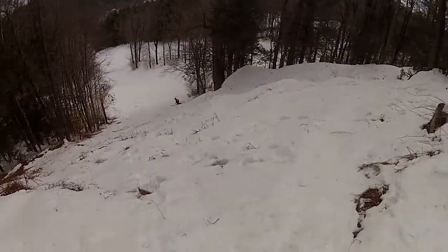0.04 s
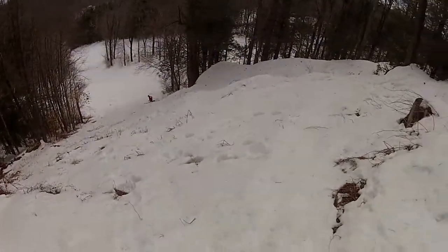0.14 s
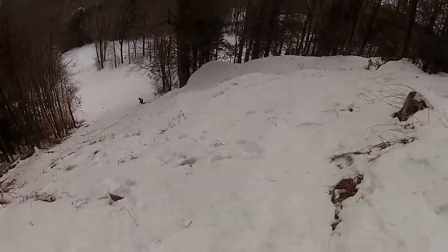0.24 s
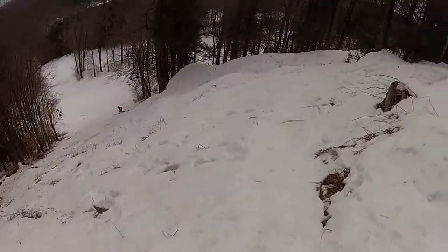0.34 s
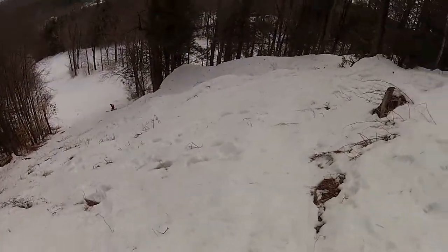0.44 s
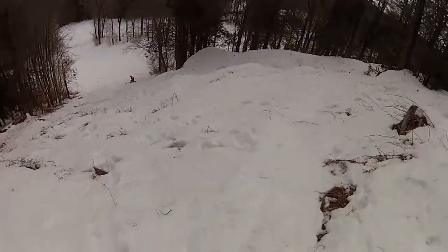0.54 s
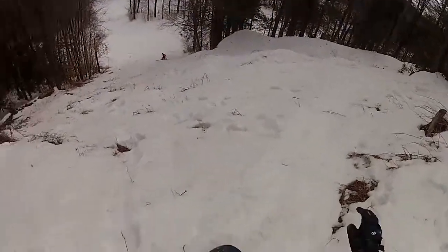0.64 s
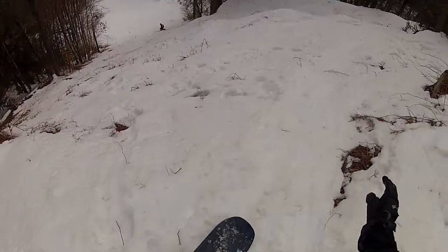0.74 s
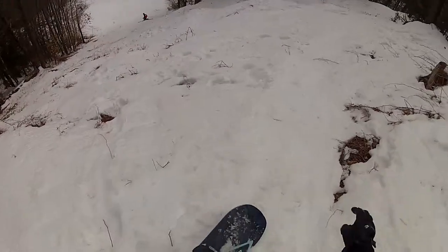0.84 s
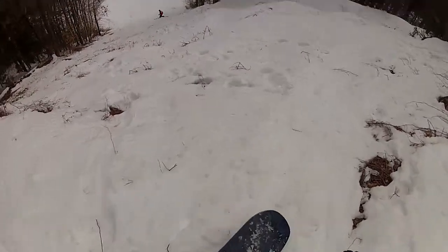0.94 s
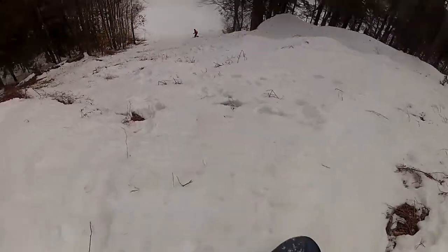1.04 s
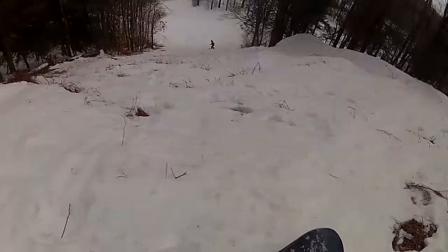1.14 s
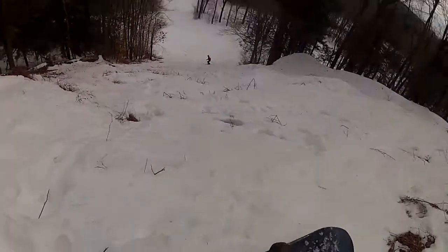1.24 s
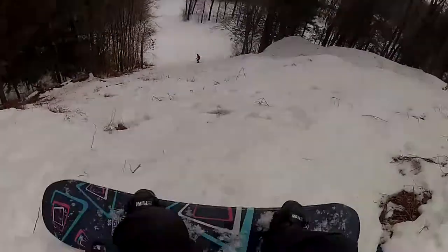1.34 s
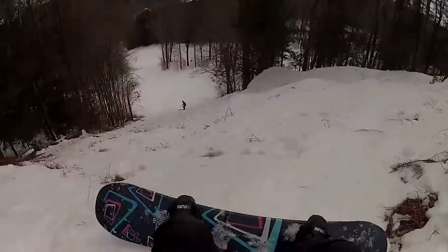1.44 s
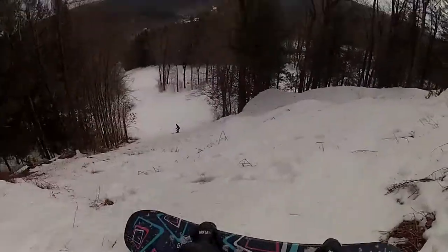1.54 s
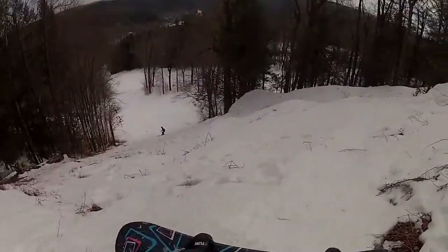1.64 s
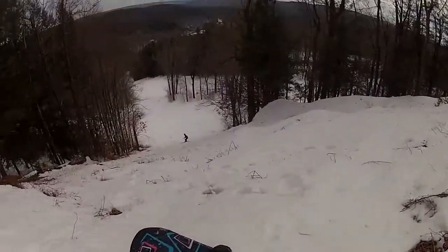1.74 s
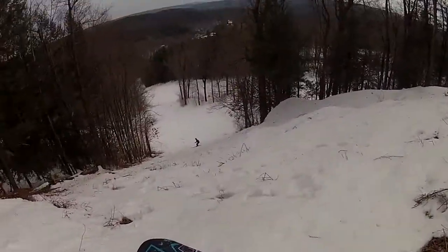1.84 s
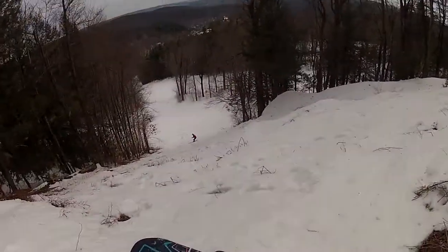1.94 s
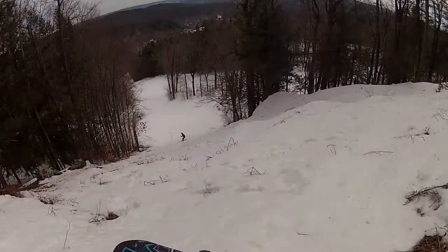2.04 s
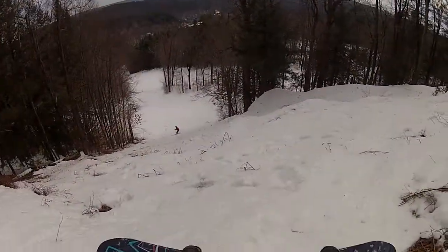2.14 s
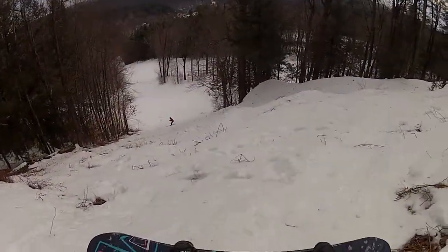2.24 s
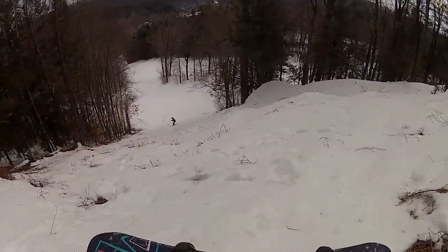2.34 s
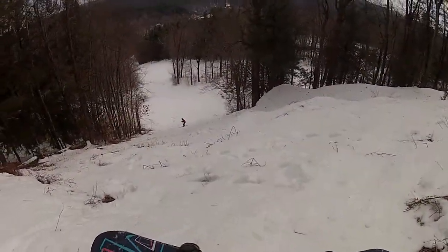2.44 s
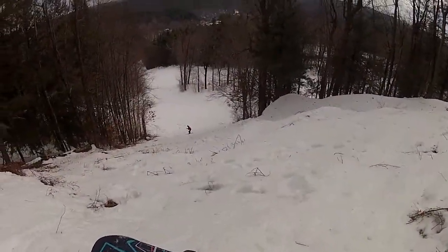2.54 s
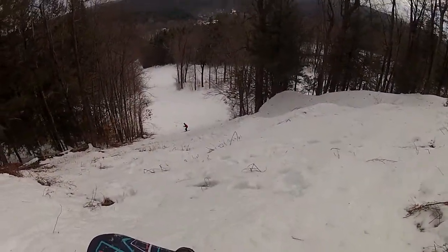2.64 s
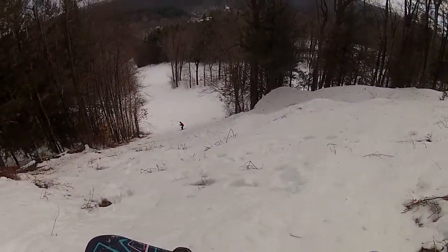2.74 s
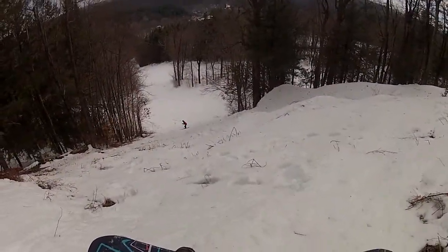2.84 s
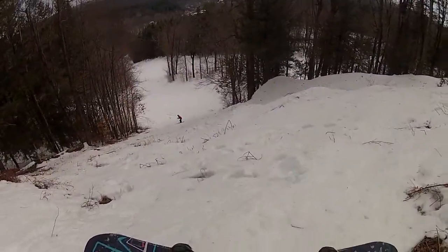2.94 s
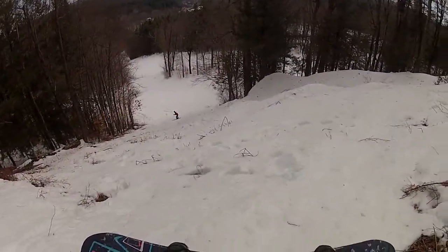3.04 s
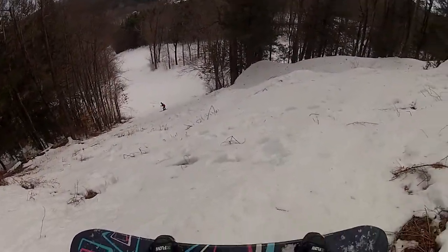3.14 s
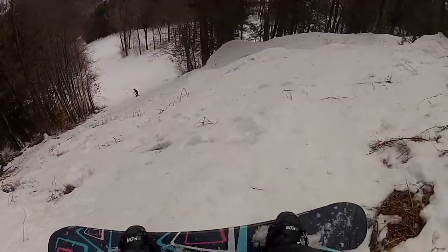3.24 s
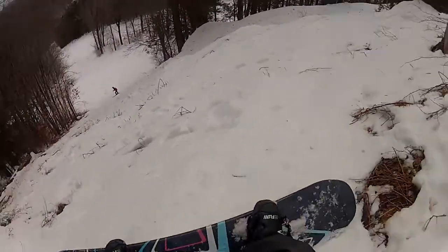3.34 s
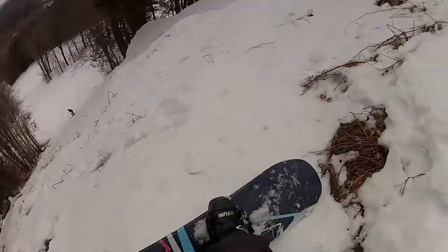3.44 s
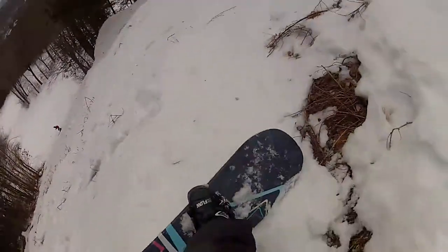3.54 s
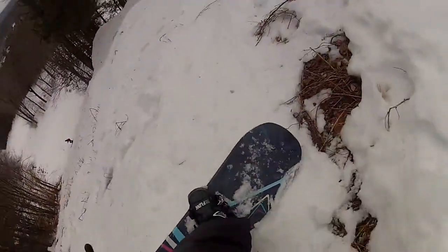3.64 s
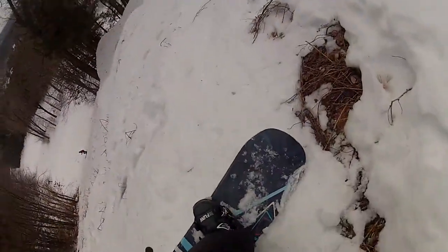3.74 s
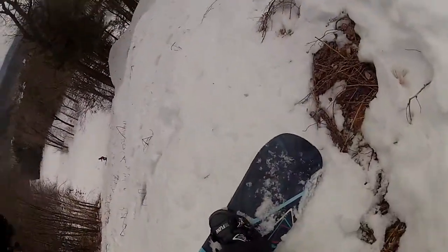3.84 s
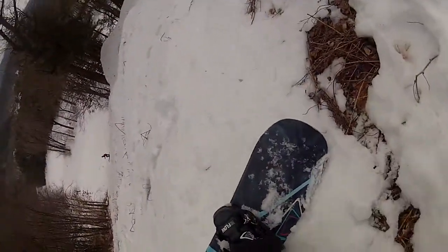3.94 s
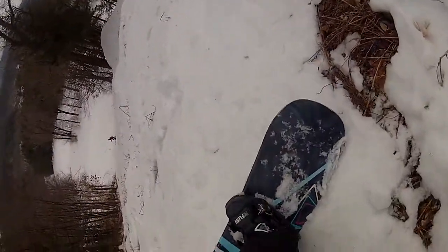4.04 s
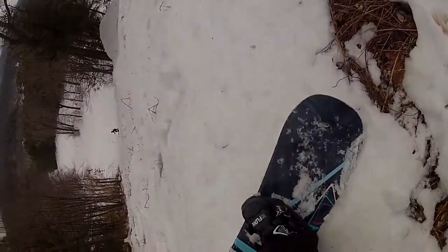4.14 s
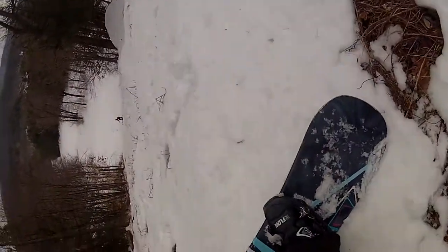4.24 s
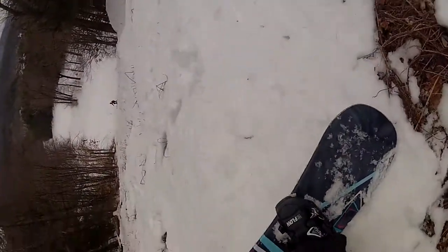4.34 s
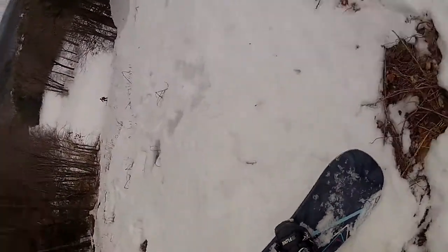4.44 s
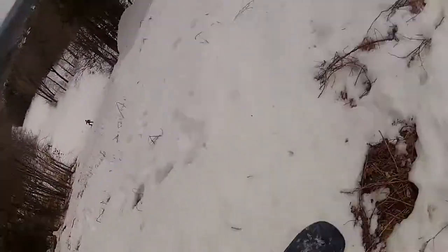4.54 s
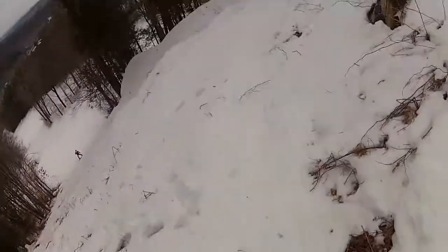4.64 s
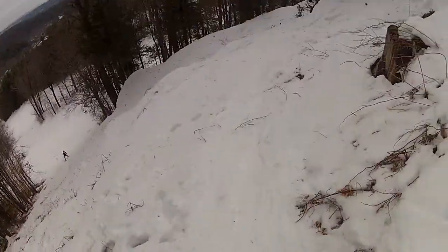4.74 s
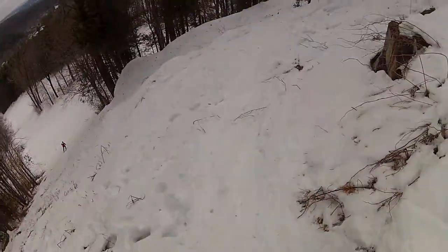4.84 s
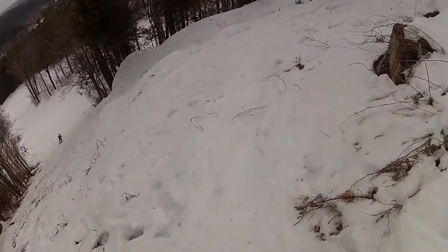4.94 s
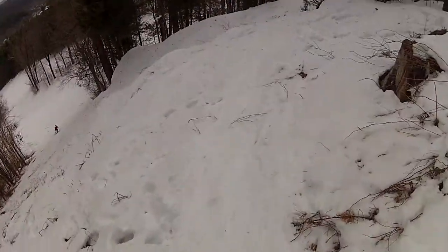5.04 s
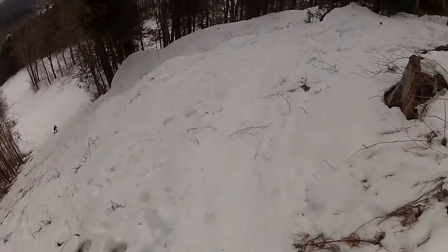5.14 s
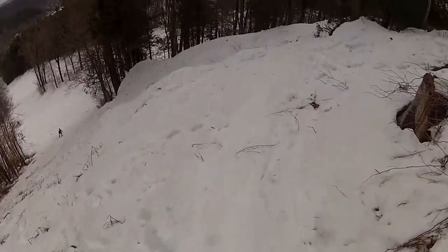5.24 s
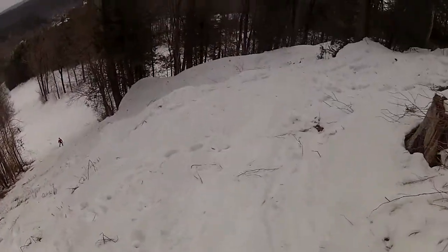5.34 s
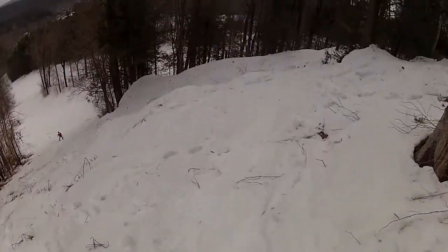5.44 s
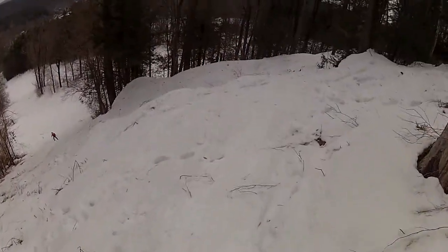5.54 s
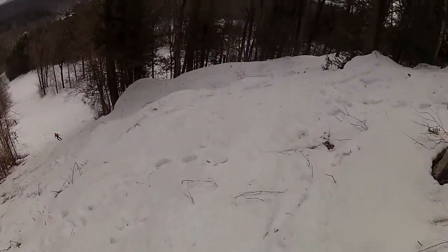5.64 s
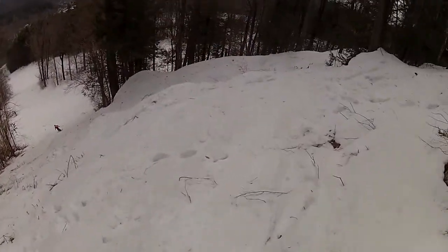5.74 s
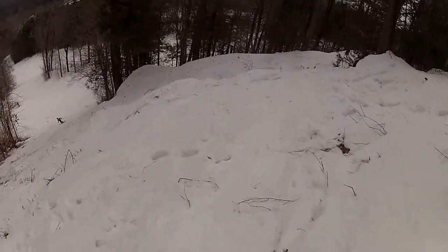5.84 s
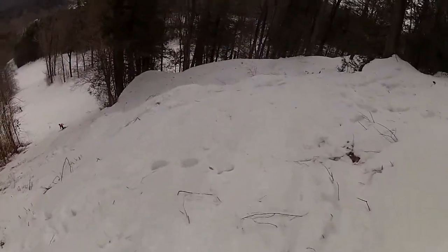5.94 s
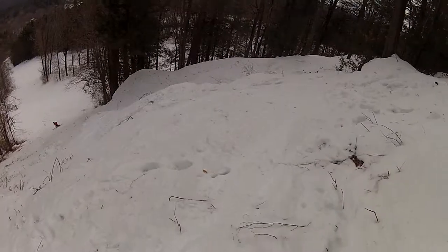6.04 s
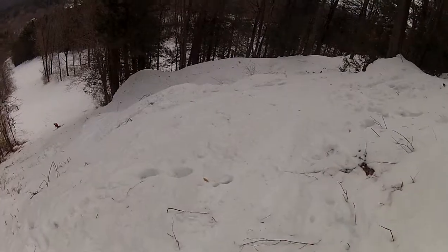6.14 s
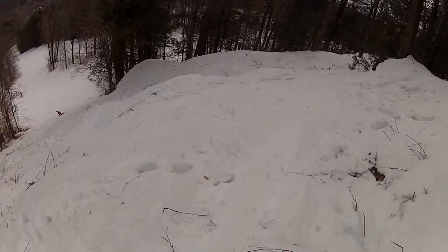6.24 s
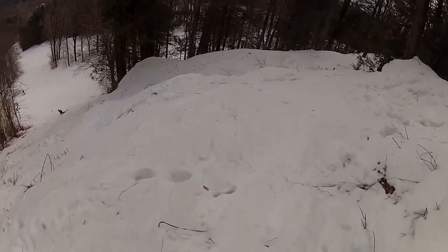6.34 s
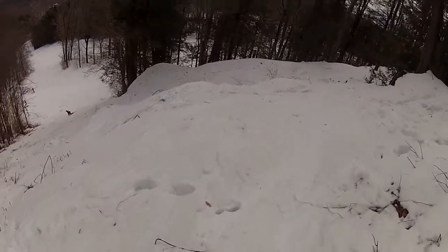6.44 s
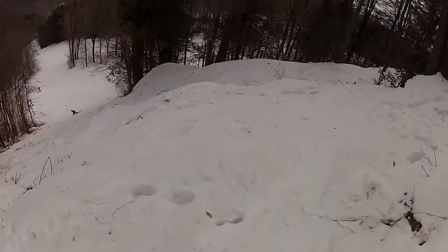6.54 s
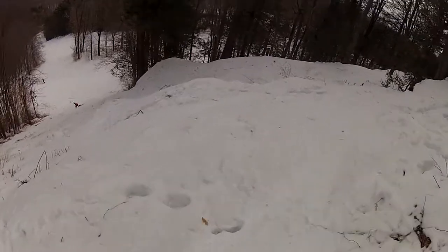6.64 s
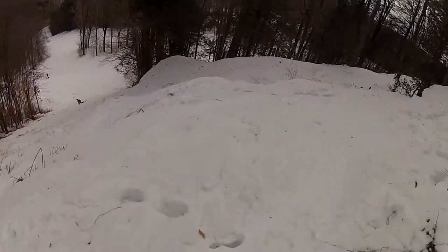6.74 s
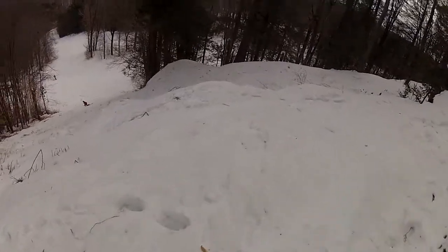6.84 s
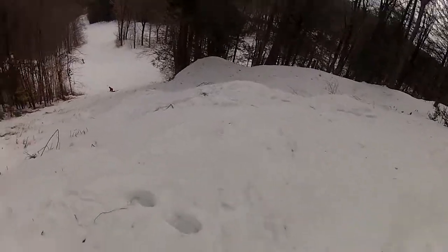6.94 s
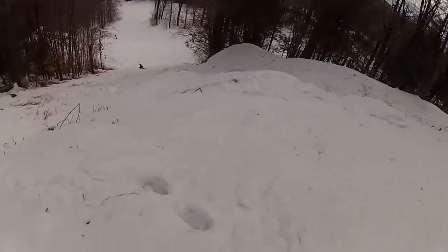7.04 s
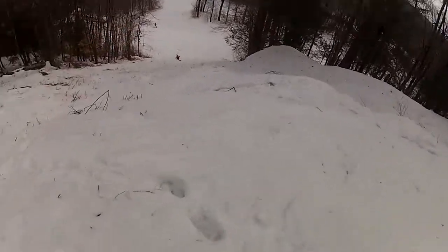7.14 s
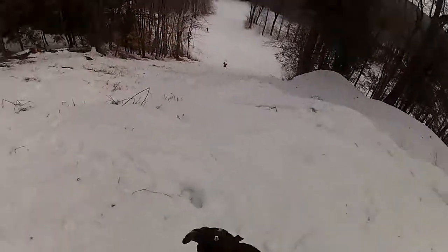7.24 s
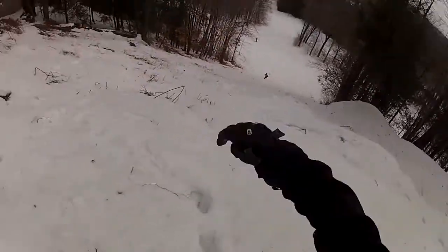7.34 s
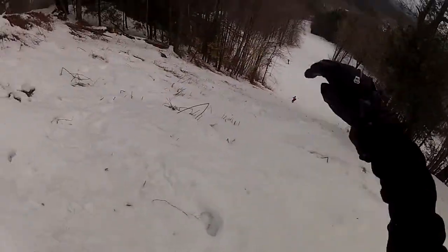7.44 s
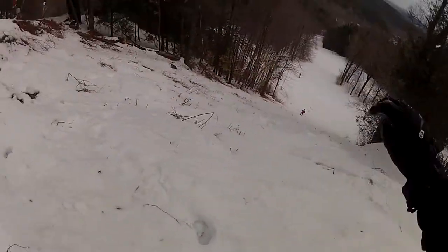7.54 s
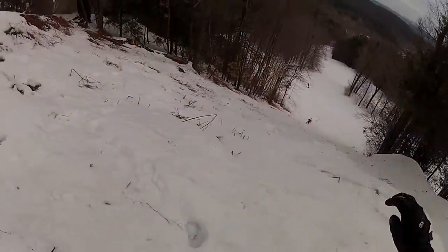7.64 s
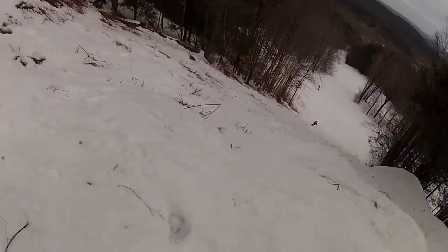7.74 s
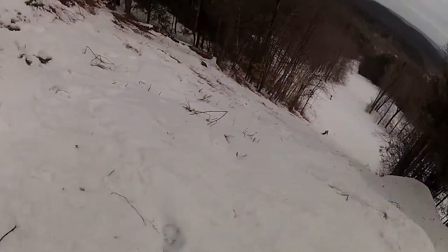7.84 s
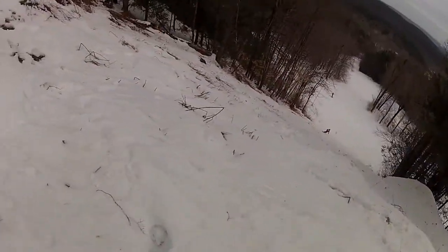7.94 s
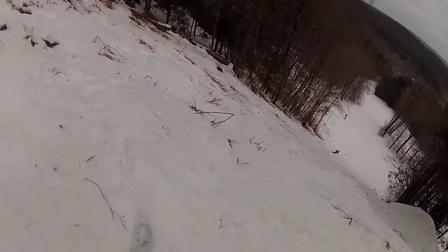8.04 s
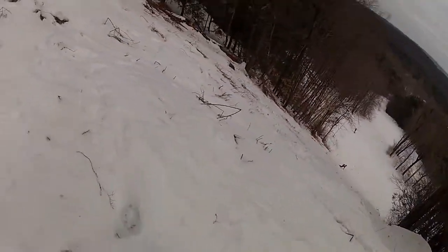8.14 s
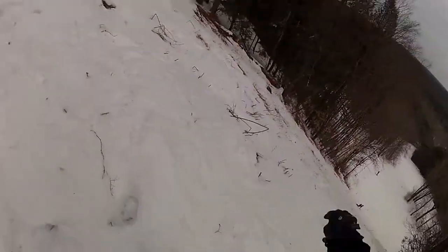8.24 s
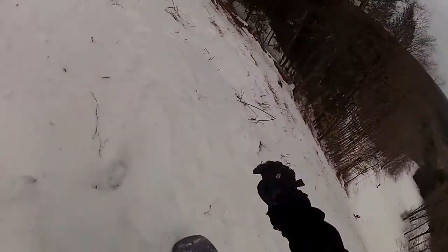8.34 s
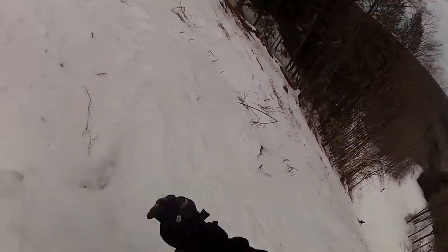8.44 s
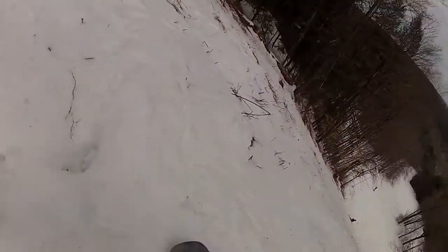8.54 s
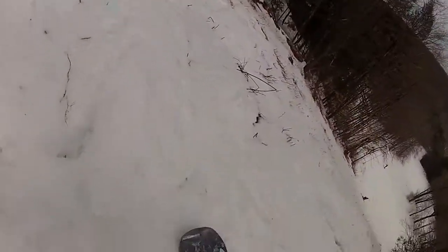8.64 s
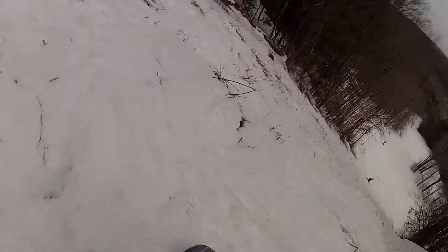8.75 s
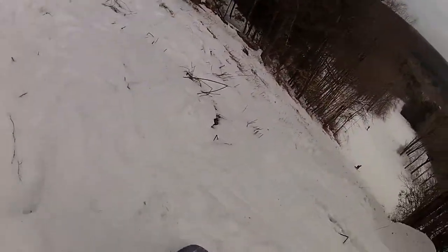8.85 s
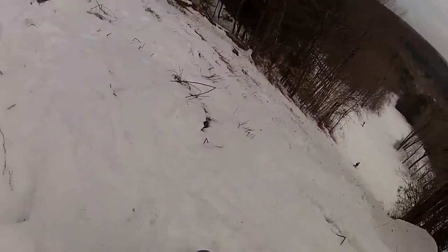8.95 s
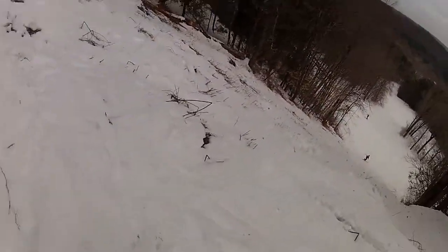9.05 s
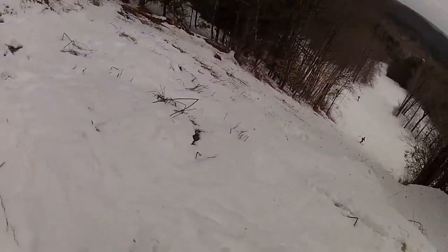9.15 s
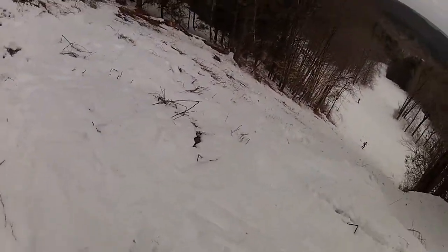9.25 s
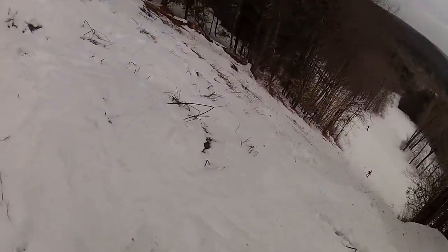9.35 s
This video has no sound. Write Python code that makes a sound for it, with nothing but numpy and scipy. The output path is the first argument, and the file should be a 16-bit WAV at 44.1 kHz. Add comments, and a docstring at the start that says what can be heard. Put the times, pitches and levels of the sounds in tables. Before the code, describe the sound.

Muffled, gritty scrapes of a board on hard snow come and go, broken by soft knocks, crust snaps and brief low rumbles.

```python
"""A crusty snow slope, heard inside the closed housing of a helmet camera as a snowboard sidles and scrapes down.
The edge grinds in bursts: crumbling noise drives the board's body and bending modes and throws hissing spray.
Swelling low noise is the rumble of board and wind; coloured noise and a wavering tone make the far slope and its hum.
Paired sine modes slap, and short noise cracks ring the housing and ping as crust and twigs snap.
The camera holds each sample for a 12 kHz step, which mirrors the sound around that rate."""
import sys
import numpy as np
from scipy import signal
from scipy.fft import rfft, irfft, next_fast_len
from scipy.io import wavfile
from scipy.ndimage import uniform_filter1d, map_coordinates

SR = 44100
rng = np.random.default_rng(int(sys.argv[2]) if len(sys.argv) > 2 else 0)


def materialize(psi):
    """Save the field psi as 16-bit PCM at rate SR to the path in sys.argv[1].

    A 1-D psi becomes a single channel; in a 2-D psi each row is a channel.
    """
    bounded = np.clip(np.atleast_2d(psi).T, -1, 1)
    quanta = np.round(bounded * 32767).astype(np.int16)
    wavfile.write(sys.argv[1], SR, quanta)


N = 414981

# The steady slide: [t/s, grinding level/dB, upper mode level/dB re grinding, spray level/dB re grinding]
STEADY_SLIDE = [(0, -54.5, -4, -8.5), (1, -46.5, 7, -4), (1.9, -49.5, 4.5, -9), (2.6, -51, -4.5, -9.5),
                (2.9, -56.5, -3.5, -10.5), (3.6, -52, 4, -8), (4.15, -58, 1, -8), (4.55, -50.5, 4.5, -6.5),
                (4.8, -38.5, -2.5, -13), (5.1, -33, -0.5, -20), (5.6, -31, -5, -17.5), (5.95, -34, 3, -12),
                (6.18, -44.5, 6, -8), (6.45, -40, 7.5, -6.5), (6.7, -28, -6.5, -19), (7, -40, 3.5, -7.5),
                (7.1, -39, 4, -12), (7.31, -53, 5, -3.5), (8.5, -42.5, -3.5, -12.5),
                (9.13, -47.5, 0, -12.5), (9.23, -57, -2, -9), (9.41, -50, 4, -11)]
# Edge bites: [start t/s, length t/s, grinding level/dB at release, climb during the bite level/dB,
#              upper mode level/dB re grinding, spray level/dB re grinding]
EDGE_BITES = [(.125, 0.16, -35.5, 5, -3.5, -18.5), (.29, 0.084, -25, 18.5, -0.5, -17),
              (.39, 0.096, -34, -1, -0.5, -16.5), (.595, 0.026, -44, -1.5, 5, -5.5),
              (.65, 0.04, -37.5, 7, 11.5, -2), (.822, 0.016, -49, 2, -4, 5),
              (.87, 0.032, -42.5, -2.5, 7.5, -14), (.97, 0.045, -29, 10.5, -0.5, -12.5),
              (1.05, 0.057, -35.5, 14, 5, -4), (1.15, 0.069, -35, 17, 5, -7.5),
              (1.28, 0.077, -22.5, 10, -2.5, -8.5), (1.385, .03, -37, -4.5, 3, -2.5),
              (1.43, 0.073, -29, 2.5, 6, -4), (1.521, 0.083, -19, 2, -4.5, -13.5),
              (1.614, 0.039, -28, -7.5, -7, -16), (1.733, 0.06, -30.5, -1.5, -4, -17),
              (1.8, 0.045, -44.5, -9, 4, -14), (2.02, 0.075, -28, 5.5, -5, -16.5),
              (2.119, 0.12, -33, -3, -2.5, -11), (2.45, 0.086, -42, 6.5, 1, -15.5),
              (3.15, 0.054, -36, 17, -1, -12), (3.27, 0.046, -38.5, 19, 0, -6),
              (3.57, 0.017, -52.5, -11, 5, -11.5), (3.72, 0.075, -44, 6, 1, -13),
              (4.201, 0.034, -39, -2.5, -5, -10.5), (4.63, 0.062, -37, 6, -3, -29),
              (4.87, 0.015, -36, 4, -26, -25), (5.03, 0.11, -29, 11, -23, -18.5),
              (5.4, 0.097, -32.5, 0, -5, -14), (5.72, 0.018, -38, 0, 4, -16),
              (5.88, 0.094, -29.5, 10, 3.5, -16), (6.275, 0.017, -47, 3, 17.5, -17),
              (6.53, 0.075, -36, 1, 4.5, -20), (6.759, 0.085, -23.5, 3.5, -6.5, -20.5),
              (6.86, 0.092, -29, -2.5, 2.5, -18), (7.39, 0.097, -46.5, -5.5, -4, -9.5),
              (7.568, 0.546, -30.5, 1.5, -2.5, -20.5), (7.89, 0.068, -31, 14, -9, -18),
              (7.999, 0.11, -38.5, 1, -10, -10), (8.13, 0.082, -26.5, 8, -3.5, -14.5),
              (8.241, 0.072, -24, 1.5, -8.5, -19), (8.34, 0.092, -31, -2.5, -2.5, -13.5),
              (8.429, 0.051, -22.5, 5, -6, -21), (8.565, 0.018, -42, 4, -5, -25),
              (8.63, 0.063, -28, -2, -4.5, -24), (8.695, 0.029, -28.5, 0, 1.5, -23),
              (8.73, .11, -37, -11, -4.5, -20), (8.899, 0.099, -28.5, 7, -2.5, -14.5),
              (9.011, 0.13, -37.5, -7, 2, -17.5), (9.3, 0.023, -44, 9.5, 10.5, -3)]
# How fast a bite dies when it lets go, one row each for grinding, upper mode, spray: [fall/(dB/s)]
BITE_RELEASE = [
    [400],
    [450],
    [560],
]
GRIP_DB_PER_S = 698  # how fast a bite sets in

# Colour of the board's low body: [f/Hz, level/dB]
LOW_BODY_COLOUR = [(60, -41.5), (110, -9.5), (160, -6), (230, -3), (310, 3), (400, -4), (520, -10.5),
                   (900, -60)]
# Colour of the board's upper body mode: [f/Hz, level/dB]
UPPER_BODY_COLOUR = [(250, -43.5), (400, -3), (500, -1), (620, 2), (720, 1), (820, -9.5), (950, -19),
                     (1150, -35.5), (1500, -47.5)]
# The board's bending mode: [f/Hz, width f/Hz, level/dB]
BENDING_MODE = [(138.4, 52, 0)]
# How strongly the board bends: [t/s, bending level/dB re grinding]
BENDING_LEVEL = [(0, -10), (1.7, -9), (3, -16.5), (4, -4), (4.8, -20), (5.8, -9.5), (7.5, -11.5),
                 (9.41, -22)]
# Colour of the thrown snow: [f/Hz, level/dB per Hz]
SPRAY_COLOUR = [(600, -22.5), (1000, 1.5), (1400, -2), (1750, -1), (2050, 1.5), (2300, -1.5), (2650, -1),
                (3050, 0.5), (3400, -9), (3870, -3), (4250, -13.5), (5050, -10.5), (5900, -29.5)]
# Fine spray gains this many dB for each dB of spray above the even level
FINE_ABOVE_HZ, FINE_GROWTH, FINE_EVEN_DB = 3700, 0.092, -41.5

# Swells of the low rumble: [peak t/s, level/dB]
RUMBLE_SWELLS = [(.15, -51), (.47, -54), (.73, -42), (.92, -47), (1.2, -35), (1.28, -27), (1.5, -48),
                 (2.04, -52), (3.72, -49), (4.56, -61), (5.87, -44), (6.8, -49), (7.58, -41.5), (8.25, -41),
                 (8.65, -57)]
FLOOR_DB, SWELL_RISE_DB_PER_S, SWELL_FALL_DB_PER_S = -60, 113, 70
# Colour of the low rumble: [f/Hz, level/dB]
RUMBLE_COLOUR = [(12, -50), (25, -5.5), (40, -3), (65, 0.5), (100, 2), (160, -43.5)]

# Colour of the distant slope and woods: [f/Hz, level/dB per Hz]
FAR_COLOUR = [(60, -27), (130, -3), (270, -7.5), (450, -2), (680, -16), (900, -24), (1500, -44),
              (3000, -29.5), (4500, -28), (5900, -32)]
# The far hum: [t/s, level/dB]
HUM_LEVEL = [(1.6, -58), (4.4, -56), (4.8, -58), (9.41, -62)]

# Board slaps and jolts: [t/s, low mode level/dB, upper mode level/dB re low mode, low mode f/Hz]
BOARD_SLAPS = [(0.039, -22.5, -14, 226), (.11, -18, -28, 197), (0.133, -19.5, -27, 305),
               (.377, -16, -12, 357), (.489, -26.5, 8, 338), (0.577, -19, -5, 302), (0.733, -19, -7, 275),
               (0.758, -22, 11.5, 243), (.768, -30, 7, 333), (1.087, -23, 2.5, 350), (1.197, -27, 4, 200),
               (1.268, -9, -10.5, 234), (1.725, -11.5, -15, 217), (1.891, -15.5, 2, 370),
               (1.935, -31.5, 4.5, 358), (2.029, -17.5, -14, 276), (2.795, -42.5, 4.5, 282),
               (2.857, -44.5, 4.5, 283), (3.126, -27.5, -6.5, 274), (3.273, -33.5, 1, 220),
               (3.288, -29.5, -15, 219), (3.304, -22, -18, 286), (3.345, -41, 18, 270),
               (3.437, -14, -14, 312), (3.555, -28, 6, 256), (3.716, -40.5, 10.5, 258),
               (3.896, -38, 6.5, 326), (4.198, -15, -2.5, 303), (4.204, -14, -5, 314), (4.24, -36, 8, 258),
               (4.453, -27, -5.5, 219), (4.638, -25, -4, 342), (4.938, -31.5, 15, 375),
               (4.944, -17.5, 0.5, 360), (5.071, -16.5, -21, 340), (5.624, -14.5, -12, 234),
               (5.673, -15, -9, 302), (5.68, -12, -20, 125), (5.69, -16, -6, 183), (5.849, -14, -20, 126),
               (5.854, -19.5, -1, 268), (5.955, -21, 0, 287), (5.957, -14, -20, 140),
               (6.844, -16, -24, 340), (7.384, -27, -15, 282), (7.426, -27.5, 0, 302),
               (7.565, -19, -20, 270), (7.957, -16, -20, 266), (8.257, -21.5, 1, 228),
               (8.616, -12, -11, 307), (8.637, -8, -30, 292), (9.314, -25.5, -5, 324)]
UPPER_ABOVE_HZ = 284  # the upper mode lies this far above the low one

# Snaps of crust and twigs: [t/s, drive level/dB, bright level/dB re drive, knock level/dB re drive,
#                            burst's 60 dB decay t/s, ping f/Hz, ping level/dB re drive]
CRUST_SNAPS = [(0.1676, -34.5, -9, -17, 0.025, 2970, -12), (0.431, -39, -13, 1, 0.015, 2980, -16),
               (0.7392, -35, -6, -6, 0.017, 2600, -3.5), (0.7563, -29, 0, 9, 0.032, 3200, -4),
               (1.1938, -39, 7.5, -2, 0.025, 3000, -8), (2.792, -50, -11, 1, 0.039, 2930, 5),
               (2.856, -49, -18, -12, 0.02, 2570, -12), (3.3415, -24.5, -8, -8, 0.018, 2800, -10.5),
               (3.5537, -26.5, -19, -10, 0.029, 3150, -14.5), (3.678, -38.5, -14, -11, 0.025, 3010, -10.5),
               (3.783, -48, -15, 3.5, 0.019, 3050, -6), (3.82, -47, -9, -2, 0.02, 3070, -6),
               (3.863, -40, -11, -9, 0.036, 2860, -11), (3.897, -47, -12, -5, 0.033, 2830, -13),
               (4.887, -40, -7, -16, 0.022, 2960, -7), (4.9097, -31, -20, -18, 0.019, 2600, -17),
               (4.938, -18, -10.5, -10, 0.04, 3070, -17), (4.9439, -15.5, -21, -15, 0.024, 2530, -11.5),
               (5.3961, -34.5, -2, -24, 0.027, 2950, -1), (5.401, -27.5, 2, -29, 0.037, 2885, -9),
               (5.4114, -44, 1, -14, 0.048, 2940, -4), (5.5051, -24.5, -8.5, -15, 0.016, 2640, -12),
               (6.294, -28.5, -10, -10, 0.013, 2630, -14), (7.0145, -28.5, -17, -10, 0.021, 2980, -18),
               (7.517, -33, -20, -14, 0.11, 2770, -15), (7.655, -31, -26, -13.5, 0.051, 2660, -26),
               (7.7103, -26, -19, -14, 0.06, 2980, -13), (7.8123, -33.5, -21, -10, 0.022, 2550, -15),
               (7.921, -34.5, -18, -6, 0.031, 2730, -13), (8.1483, -32, -11, -8, 0.023, 2660, -7),
               (8.182, -38, -10, -8, 0.03, 2860, -5), (8.25, -31.5, -17, -22, 0.044, 2960, -10),
               (8.3647, -28.5, -16, -7, 0.016, 2650, -16)]
# Lower housing modes: [f/Hz, width f/Hz, level/dB]
HOUSING_LOW = [(1734, 200, 1), (2420, 270, -3.5)]
# Bright housing modes: [f/Hz, width f/Hz, level/dB]
HOUSING_BRIGHT = [(3770, 200, 2.5), (4900, 1300, -9.5)]
# The mount's hollow mode: [f/Hz, width f/Hz, level/dB]
MOUNT_KNOCK = [(1070, 153, 6)]
PING_WIDTH_HZ = 210
GAP_HZ, GAP_WIDTH_HZ = 4180, 650  # the housing notches the snaps out here

HOLD_HZ, SOFT_HZ, TOP_HZ = 12000, 15100, 16468  # hold rate, start of the top roll-off, cutoff


def amp(db):
    """Gain of a level in dB."""
    return 10 ** (np.asarray(db) / 20)


def unit(x):
    """x brought to an RMS of one."""
    return x / np.sqrt(np.mean(x ** 2) + 1e-20)


def curves(rows):
    """One value per sample for each column after the time."""
    s, *columns = np.transpose(rows)
    return [np.interp(np.arange(N) / SR, s, column) for column in columns]


def wobble(rate):
    """A smooth random curve, rate knots a second."""
    knots = rng.standard_normal(int(N * rate / SR) + 4)
    return map_coordinates(knots, [np.arange(N) * rate / SR])


def filtered(x, response):
    """x times a complex response of frequency."""
    size = next_fast_len(N + SR // 2)
    spectrum = rfft(x, size) * response(np.fft.rfftfreq(size, 1 / SR))
    return irfft(spectrum, size)[..., :N]


def coloured(x, points):
    """Causal colouring by (f/Hz, level/dB) points, through the folded cepstrum."""
    f, db = np.transpose(points)
    size = 2 ** 14
    hz = np.fft.rfftfreq(size, 1 / SR)
    level = np.interp(np.log(hz + 1), np.log(f + 1), np.maximum(db, -70))
    cepstrum = irfft(np.log(amp(level)))
    cepstrum[1:size // 2] *= 2
    cepstrum[size // 2 + 1:] = 0
    impulse = irfft(np.exp(rfft(cepstrum)))
    return signal.fftconvolve(x, impulse)[:N]


def ringing(x, modes):
    """x through (f/Hz, width f/Hz, level/dB) resonances, summed with alternating sign."""
    def response(hz):
        total = 0
        for k, (centre, width, db) in enumerate(modes):
            damping = 1j * hz * width
            total = total + (-1) ** k * amp(db) * damping / (centre * centre - hz * hz + damping)
        return total
    return filtered(x, response)


def patchy(x, depth_db):
    """The colour wanders: random gain in patches of a few hundred Hz and a tenth of a second."""
    z = signal.stft(x, nperseg=256)[2]
    field = uniform_filter1d(rng.standard_normal(z.shape), size=3, axis=0)  # across frequency
    field = uniform_filter1d(field, size=36, axis=1)  # across time
    return signal.istft(z * amp(depth_db * unit(field)), nperseg=256)[1][:N]


def crumbs(rate, spread_db, smooth):
    """Snow giving way: random pushes of uneven size, rate a second, over a share of plain noise."""
    size = amp(spread_db * np.minimum(rng.exponential(1, N), 2.1))
    pushes = -size * (rng.random(N) < rate / SR)
    share = np.clip(smooth, 0, 1)
    return np.sqrt(1 - share) * unit(pushes - pushes.mean()) + np.sqrt(share) * rng.standard_normal(N)


def pressure():
    """Gains of grinding, upper mode and spray: the slide plus every bite, which grips, climbs and lets go."""
    t = np.arange(N) / SR
    grind_db, upper_db, spray_db = curves(STEADY_SLIDE)
    power = amp(grind_db + np.array([0 * t, upper_db, spray_db])) ** 2
    for start, length, db, climb_db, upper_db, spray_db in EDGE_BITES:
        near = slice(max(round((start - .15) * SR), 0), round((start + length + .25) * SR))
        since = t[near] - start
        climb = climb_db * (np.clip(since / length, 0, 1) - 1)
        grip = GRIP_DB_PER_S * np.maximum(-since, 0)
        release = np.array(BITE_RELEASE) * np.maximum(since - length, 0)
        balance = np.array([[0], [upper_db], [spray_db]])
        power[:, near] += amp(db + climb - grip - release + balance) ** 2
    return np.sqrt(power)


def edge():
    """Crumbling snow drives the body modes of the board; the edge chatters and throws spray, brighter when strong."""
    grind, upper, thrown = pressure()
    chatter = 0.12 * wobble(12) + 1.38 * wobble(40)  # dB

    push = crumbs(rate=300, spread_db=3.0, smooth=0.47)
    low = amp(chatter + 1.3 * wobble(25)) * coloured(push, LOW_BODY_COLOUR)
    flex = amp(chatter) * ringing(push, BENDING_MODE)
    upper_push = crumbs(rate=400, spread_db=3.5, smooth=0.64)
    high = amp(chatter + 2.18 * wobble(25)) * coloured(upper_push, UPPER_BODY_COLOUR)

    grit = patchy(crumbs(rate=450, spread_db=2.0, smooth=0.84), depth_db=1.3)
    flutter = amp(1.03 * wobble(110) + 0.88 * wobble(22))
    spray = coloured(flutter * grit, SPRAY_COLOUR)
    fine = filtered(spray, lambda hz: 1 / (1 + (FINE_ABOVE_HZ / (hz + 1)) ** 4))
    spray = spray + fine * ((thrown / amp(FINE_EVEN_DB)) ** FINE_GROWTH - 1)

    body = unit(low) + amp(curves(BENDING_LEVEL)[0]) * unit(flex)
    return grind * body + upper * unit(high) + thrown * unit(spray)


def rumble():
    """Low rumble of board and wind: lumpy noise on a faint floor, with swells that rise quickly and fade."""
    t = np.arange(N) / SR
    swells = []
    for peak, db in RUMBLE_SWELLS:
        rise = SWELL_RISE_DB_PER_S * np.maximum(peak - t, 0)
        fall = SWELL_FALL_DB_PER_S * np.maximum(t - peak, 0)
        swells.append(db - rise - fall)
    gain = amp(FLOOR_DB) + amp(np.max(swells, axis=0))
    lumps = amp(4.7 * wobble(3.08))
    return gain * unit(lumps * coloured(rng.standard_normal(N), RUMBLE_COLOUR))


def far():
    """Quiet rush of the slope as wandering noise, and a low steady hum, perhaps lift machinery."""
    air = patchy(coloured(rng.standard_normal(N), FAR_COLOUR), depth_db=2.0)
    rush = unit(amp(5.6 * wobble(5.0)) * air)
    phase = 2 * np.pi * np.cumsum(77 + .3 * wobble(5)) / SR  # about 77 Hz
    hum = np.sqrt(2) * np.sin(phase) * amp(.7 * wobble(5))
    return amp(-55.0) * rush + amp(curves(HUM_LEVEL)[0]) * hum


def slaps():
    """Each slap is a soft push that briefly rings two modes; the upper sags in pitch as the snow yields."""
    out, t = np.zeros(N + SR), np.arange(SR // 8) / SR
    sag = t + 0.00036 * (1 - np.exp(-t / 0.0012))  # bent time: sharp at first, then true
    swell = (1 - np.exp(-(t / 0.0018) ** 2)) * amp(-60 * t / 0.029)
    swell = swell / swell.max()
    for s, db, upper_db, low_hz in BOARD_SLAPS:
        low = np.sin(2 * np.pi * low_hz * t)
        upper = np.sin(2 * np.pi * (low_hz + UPPER_ABOVE_HZ) * sag)
        out[round(s * SR):][:len(t)] += amp(db) * swell * (low + amp(upper_db) * upper)
    # the board cannot push a steady pressure
    return filtered(out[:N], lambda hz: (1j * hz / (70 + 1j * hz)) ** 2)


def snaps():
    """A sharp break with a short crack of noise rings the housing modes; the broken piece pings at its own pitch."""
    cracks, t = np.zeros((4, N + SR)), np.arange(SR // 10) / SR
    ping_decay = 2 * np.pi * PING_WIDTH_HZ / SR * np.exp(-np.pi * PING_WIDTH_HZ * t)
    for s, db, bright_db, knock_db, t60, ping_hz, ping_db in CRUST_SNAPS:
        grit = rng.standard_normal((4, len(t)))
        burst = amp(db - 60 * t / t60) * (1 - np.exp(-t / 0.00082)) * grit
        burst[:, round(.0008 * SR)] -= 7 * amp(db)  # the break itself
        ping = ping_decay * np.sin(2 * np.pi * ping_hz * t)
        burst[3] = signal.fftconvolve(burst[3], ping)[:len(t)]
        start = round(s * SR)
        cracks[:, start:start + len(t)] += amp([[0], [bright_db], [knock_db], [ping_db]]) * burst
    low, bright, knock, pings = cracks[:, :N]
    rung = amp(9.5) * ringing(low, HOUSING_LOW) + amp(15.0) * ringing(bright, HOUSING_BRIGHT)
    rung = rung + amp(18.5) * ringing(knock, MOUNT_KNOCK) + amp(21.5) * pings
    return rung - ringing(rung, [(GAP_HZ, GAP_WIDTH_HZ, 0)])


def scene():
    """All layers summed to one channel."""
    return (edge() + rumble() + far() + slaps() + snaps())[None]


def record(dry):
    """Sampling at the hold rate mirrors the band around it; the hold's steps weight all by a sinc."""
    band = filtered(dry, lambda hz: np.clip((HOLD_HZ / 2 - hz) / 300, 0, 1))
    mirrored = band * (1 + 2 * np.cos(2 * np.pi * HOLD_HZ * np.arange(N) / SR))

    def hold_and_top(hz):
        top = amp(-36 * np.clip((hz - SOFT_HZ) / 700, 0, 2)) * (hz < TOP_HZ)
        return np.sinc(hz / HOLD_HZ) * top
    return filtered(mirrored, hold_and_top)


dry = scene()
out = record(dry)
materialize(out)
```